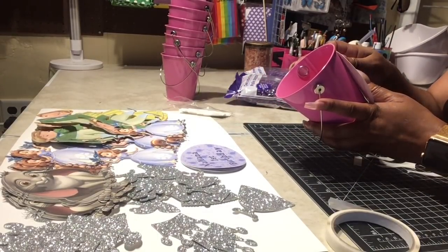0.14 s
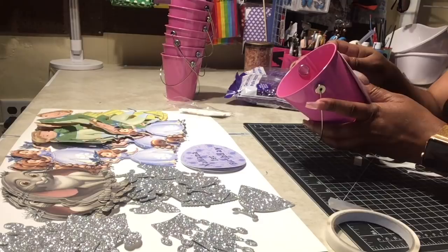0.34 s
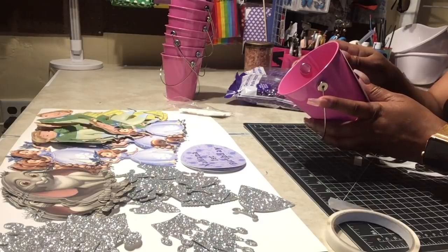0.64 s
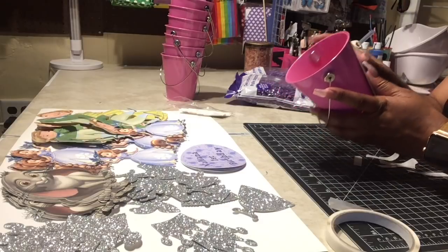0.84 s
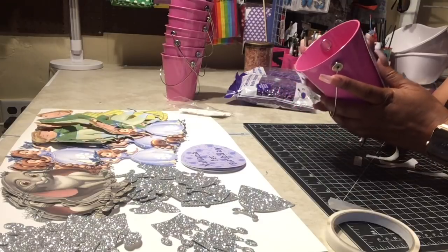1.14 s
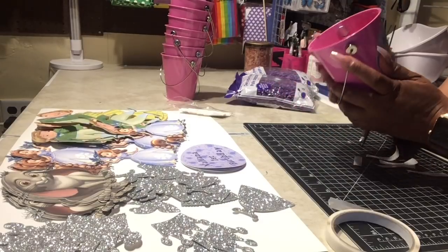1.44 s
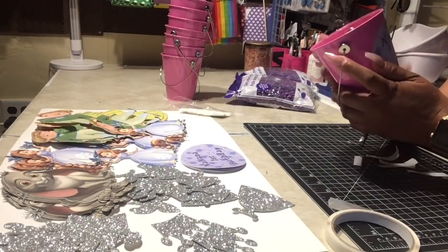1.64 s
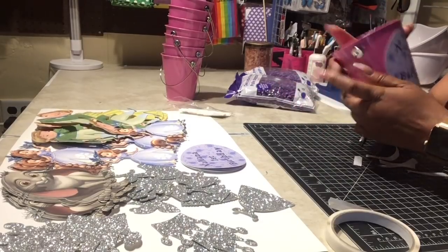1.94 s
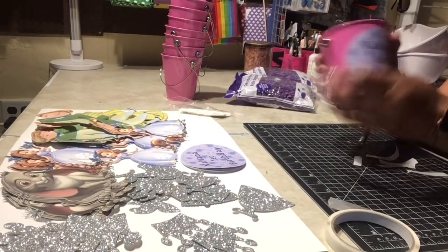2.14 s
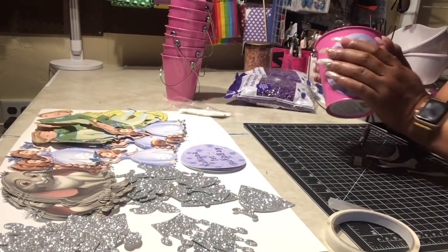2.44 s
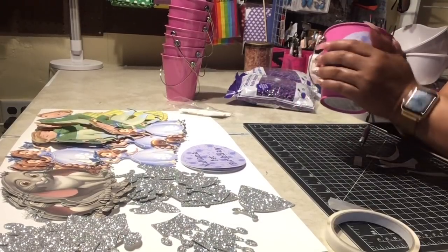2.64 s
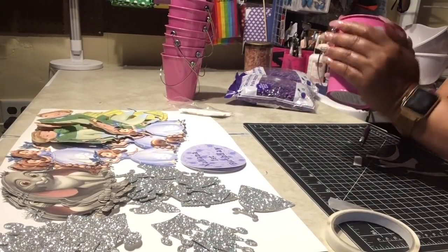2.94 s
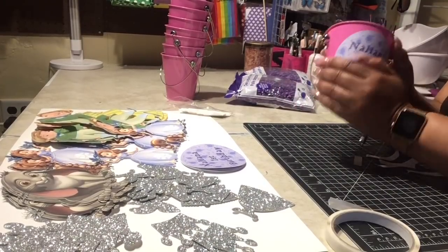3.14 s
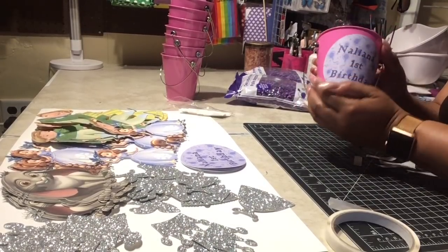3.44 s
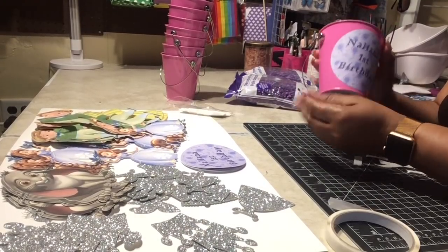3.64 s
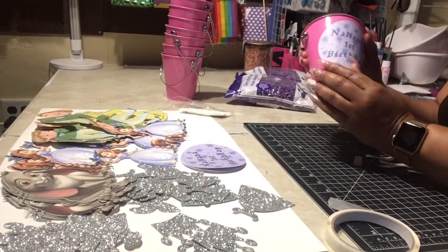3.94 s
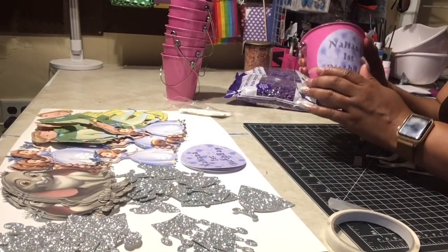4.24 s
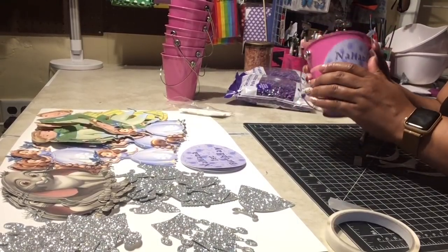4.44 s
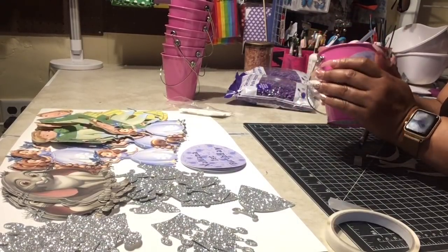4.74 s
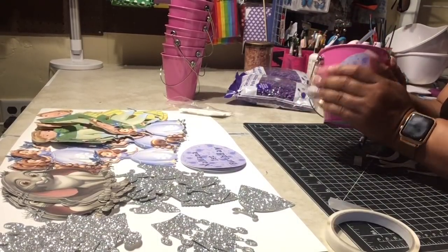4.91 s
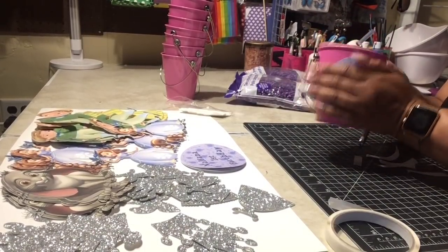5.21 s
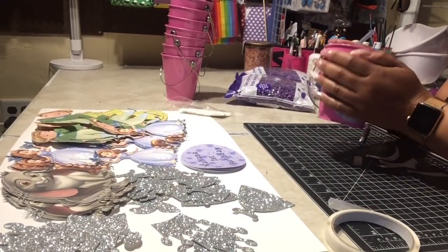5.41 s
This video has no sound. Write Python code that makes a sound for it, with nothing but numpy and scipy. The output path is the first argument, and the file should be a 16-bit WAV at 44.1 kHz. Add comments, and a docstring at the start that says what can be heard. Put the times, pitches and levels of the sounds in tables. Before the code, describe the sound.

A small metal pail is turned in the hands, its wire handle clinking in short tinny bursts between soft rubs on paper.

```python
"""A soft rub on paper, then bright, tinny clinks: a small pail is turned in the hands at a craft table.
Its wire handle skids, lands and rebounds on the thin wall, which rings briefly with the air inside,
and the wire squeaks as it sticks and slips in its lugs. A palm smooths a paper label onto the pail
in hissing strokes, and a hand lands with a soft pat. The room is small and dry, with a faint low hum."""
import sys
import numpy as np
from scipy import signal
from scipy.fft import rfft, irfft, next_fast_len
from scipy.io import wavfile

SR = 44100
rng = np.random.default_rng(int(sys.argv[2]) if len(sys.argv) > 2 else 0)


def dump_mix(stems):
    """Bounce the given channels to the path in sys.argv[1] as a 16-bit WAV at rate SR."""
    frames = np.atleast_2d(stems).T  # one column per channel
    limited = np.clip(frames, -1, 1)  # hard clip at full scale
    pcm = np.round(limited * 32767).astype(np.int16)
    wavfile.write(sys.argv[1], SR, pcm)


N = 245813
TIME = np.arange(N) / SR
RING_TIME = TIME[:SR // 3]

# the wall gains body as the pail turns from mouth-on to side-on: (time [s], low band gain [dB])
PAIL_TURN = [(1.0, -3.5), (1.8, 2), (2.0, -3), (2.5, 3), (3.15, 5.5), (4.7, 4), (5.3, 3.5)]
# how freely the fingers let the hollow ring: (time [s], level relative to the hit [dB])
HOLLOW_FREEDOM = [(0.91, -13), (1.1, -28), (1.85, -21.5), (1.98, -20.5), (2.38, -19), (2.51, -12.5),
                  (3.15, -5), (3.5, -15), (4.7, -14), (5.3, -34)]
# handle hits: (time [s], level [dB], snap [dB], top band gain [dB], strongest mode [Hz], rebounds [count])
HANDLE_HITS = [(0.683, -64.5, 8, -14, 4400, 0), (0.901, -41, 4, 6, 3040, 0),
               (0.927, -43, 13, 10.5, 3000, 0), (1.057, -49, -4, 2, 3140, 1),
               (1.103, -41.5, 7.5, 1, 4010, 1), (1.169, -57, 14, 3, 3100, 0),
               (1.234, -57, 17.5, 2, 3150, 0), (1.662, -66, 10, 12, 9100, 0), (1.767, -52, -1, -6, 4470, 1),
               (1.8302, -39, -6, 3.5, 3100, 0), (1.882, -48.5, 8.5, 2, 2540, 0),
               (1.9297, -32.5, 7, 0, 4460, 1), (1.9444, -36.5, 6, -14, 2400, 0),
               (1.963, -37.5, -4, 1, 3050, 0), (1.9889, -34, -3, 3.5, 3100, 0),
               (2.023, -36.5, 7.5, -0.5, 3000, 1), (2.096, -46, 3.5, -4, 3100, 0),
               (2.148, -52.5, 12.5, 4, 3180, 0), (2.201, -29.5, 12, -1, 5210, 0),
               (2.244, -43, 9.5, 5.5, 8200, 0), (2.352, -40, -4, 6, 9700, 0),
               (2.3764, -37, 6, 3.5, 9300, 0), (2.4, -42.5, 0, 5, 4200, 0),
               (2.4641, -40.5, -1.5, 3.5, 9400, 1), (2.511, -31.5, 6, -1, 5480, 0),
               (2.54, -39, 5, 8, 4250, 0), (2.905, -38.5, 5, 3.5, 3790, 0), (3.027, -58, 17, 12, 9450, 0),
               (3.142, -44.5, 9, 4, 2470, 0), (3.1805, -47, 8, 3, 1690, 0),
               (3.195, -47.5, 6, 10.5, 6400, 0), (3.461, -57.5, -3, 2.5, 1780, 0),
               (3.616, -54.5, 6, 0, 2870, 0), (3.998, -56, 8, -0.5, 8700, 0),
               (4.061, -51.5, -13.5, -1.5, 4670, 0), (4.656, -51.5, 4.5, 0, 3980, 1),
               (4.754, -59.5, -10, -14, 2480, 0), (4.811, -47.5, -9, -1.5, 5600, 0),
               (4.997, -51.5, 1.5, -1, 3000, 0), (5.056, -53, 4, -6, 1850, 1),
               (5.2634, -40, 9.5, 1.5, 2500, 2), (5.412, -39, 11, 0.5, 4000, 0)]


def handle(strike_db=-1, skid_s=.022, skid_db=-19.5, bounce_gap_s=.0085, bounce_db=-3.5):
    """The wire skids, lands, rings the wall and the hollow, and may rebound, weaker each time."""
    out = np.zeros(N)
    for s, db, snap_db, top_db, strongest_hz, rebounds in HANDLE_HITS:
        low_db = along(PAIL_TURN, s)
        add(out, s - skid_s, undb(db + skid_db) * skid(skid_s, low_db, top_db))
        add(out, s, undb(db + along(HOLLOW_FREEDOM, s)) * hollow(s))
        for bounce in range(1 + rebounds):
            gain = undb(db + strike_db + bounce * bounce_db)
            add(out, s + bounce * bounce_gap_s, gain * clink(snap_db, low_db, top_db, strongest_hz))
    return out


# metallic wash of the wall's crowded modes: (frequency [Hz], level [dB])
TIN_SPECTRUM = [(100, -31.5), (300, -12.5), (800, -11), (1300, -13.5), (1750, -5), (2100, -5.5), (2600, 1),
                (4600, -1), (6100, -4), (8300, -4.5), (9800, -7), (11500, -6), (14000, -7.5),
                (16000, -20.5)]


def clink(snap_db, low_db, top_db, strongest_hz, snap_t60=0.028, shimmer_t60=0.17, shimmer_db=-1.5,
          modes_db=-5, strongest_db=4, rise_s=0.0025, echo_s=0.0072, echo_db=-10):
    """One blow: the wire chatters on the tin for an instant, then the wall rings."""
    t = RING_TIME
    ring = wall_ring(t)
    # the many weaker modes blur into a shimmer, uneven in a new way at every strike point
    cluster_hz = np.linspace(500, 16000, num=90)
    uneven = np.c_[cluster_hz, 3.5 * rng.standard_normal(len(cluster_hz))]
    shimmer, crack, echo = (unit(colour(noise(TIN_SPECTRUM, len(t)), uneven)) for _ in range(3))
    chatter = unit(undb(2.5 * walk(1100, len(t))))
    snap = (.87 * crack * chatter + .5 * wall_ring(t)) * fade(t, snap_t60)
    blow = undb(snap_db) * snap + undb(shimmer_db) * shimmer * fade(t, shimmer_t60)
    blow += undb(strongest_db) * resonate(blow, strongest_hz, width_hz=140) + undb(modes_db) * ring
    # a glancing contact builds up more slowly than a square one
    blow *= np.minimum(t / (rise_s * undb(-snap_db / 2)), 1)
    # the cluttered table scatters the snap back a few milliseconds later
    late = np.maximum(t - echo_s, 0)
    blow += undb(snap_db + echo_db) * echo * np.minimum(late / rise_s, 1) * fade(late, snap_t60)
    tone = [(350, 0), (800, low_db), (1700, low_db), (2500, 0), (5800, 0.024), (8000, top_db)]
    fade_out = 1 - (t / t[-1]) ** 4
    return colour(blow, tone) * fade_out


# ringing modes of the tin wall and wire: (frequency [Hz], relative level [dB], t60 [s])
TIN_MODES = [(830, -17, .13), (1090, -14, .13), (1712, -7, .2), (2450, -1, .2), (2590, -3, .13),
             (2965, -1, .18), (3050, -2, .2), (3225, 0, .18), (3750, -5, .13), (4005, -4, .16),
             (4135, -3, .2), (4450, -3, .16), (4715, -3, .16), (5330, -4, .14), (5540, -8, .14),
             (6356, -10, .16), (6755, -10, .16), (8210, -7, .18), (8400, -9, .18), (8890, -8, .13),
             (10650, -7, .18), (10850, -4, .2), (11470, -7, .18), (12280, -8, .2), (13040, -9, .16)]


def wall_ring(t, scatter_db=10.0, detune=.007):
    """The main modes ring out; strike point and grip change the weight and tuning of each."""
    hz, db, t60 = np.transpose(TIN_MODES)
    weight = undb(db + scatter_db * rng.standard_normal(len(hz)))
    hz = hz * (1 + detune * rng.standard_normal(len(hz)))
    waves = np.sin(2 * np.pi * (np.outer(hz, t) + rng.random((len(hz), 1))))
    return np.sqrt(2) * weight / np.linalg.norm(weight) @ (waves * fade(t, t60[:, None]))


# the hollow note sinks a little as the grip changes: (time [s], pitch [Hz])
HOLLOW_PITCH = [(1.2, 601), (2.3, 586)]


def hollow(s, t60=0.21, rise_s=0.0042, detune=0.013):
    """The air in the pail blooms just after a blow; the grip shifts its pitch a little."""
    t = RING_TIME
    hz = along(HOLLOW_PITCH, s) * (1 + detune * rng.standard_normal())
    bloom = (1 - np.exp(-t / rise_s)) ** 2
    return np.sqrt(2) * np.sin(2 * np.pi * hz * t) * bloom * fade(t, t60)


def skid(length_s, low_db, top_db):
    """The wire scrapes over the tin, louder and louder until it lands."""
    size = int(length_s * SR)
    tone = [(1700, low_db), (2500, 0), (5800, 0), (8000, top_db)]
    scrape = colour(noise(TIN_SPECTRUM, 4096), tone)
    return scrape[:size] * np.linspace(0, 1, size)


# thin, dry scrape of wire on tin: (frequency [Hz], level [dB])
SCRAPE_SPECTRUM = [(6000, -44), (8200, -12.5), (9500, -0.5), (10700, -2.5), (12200, 8.5), (13000, -14.5),
                   (16000, -41)]
# tiny chirps of the wire turning in its lugs: (time [s], length [s], pitch [Hz], level [dB])
LUG_SQUEAKS = [(0.898, 0.0095, 10770, -35.5), (0.924, 0.013, 10850, -35.5), (1.197, 0.018, 11720, -41.5),
               (1.204, 0.013, 10740, -36), (1.224, 0.016, 10650, -47), (1.866, 0.017, 12500, -49),
               (1.928, 0.018, 10870, -32.5), (1.953, 0.036, 11200, -45.5), (2.526, 0.013, 10900, -41)]


def squeaks(waver=0.0044, rough_db=2, scrape_db=-5):
    """The wire sticks and slips in a lug, scraping and driving one high mode for a moment."""
    out = np.zeros(N)
    for s, length, hz, db in LUG_SQUEAKS:
        size = int(length * SR)
        whistle = np.sqrt(2) * np.sin(phase_of(hz * (1 + waver * walk(410, size))))
        swell = signal.windows.tukey(size, .6) * undb(rough_db * walk(900, size))
        scrape = noise(SCRAPE_SPECTRUM, 4096)[:size]
        add(out, s, undb(db) * swell * (whistle + undb(scrape_db) * scrape))
    return room(out, wet_db=-3.5)


# palm strokes: (time [s], length [s], level [dB], top band gain [dB], hollow level [dB])
PALM_STROKES = [(0.637, 0.2, -76.5, 0.5, -64), (0.817, 0.21, -59.5, 0, -59), (1.056, 0.28, -66.5, 6, -65.5),
                (1.289, 0.23, -68, 7.5, -83), (1.472, 0.34, -67, 2, -69.5), (1.83, 0.42, -77, 15, -78),
                (2.348, 0.57, -62.5, 4, -73.5), (2.945, 0.35, -61, 4, -74), (3.23, 0.22, -72.5, 2, -77),
                (3.4, 0.36, -80.5, 6.5, -83.5), (4.164, 0.16, -76.5, 10, -70.5),
                (4.23, 0.58, -72.5, 8.5, -78), (4.926, 0.25, -69.5, 2.5, -95), (5.193, 0.23, -71, 10, -75),
                (5.43, 0.18, -67, -10, -76.5)]


def strokes(ease_share=0.76, rest_db=-81, rest_top_db=-10.5):
    """Each stroke eases in and out; gives envelopes for the rub, its top band and the hollow's murmur."""
    rub = np.full(N, undb(rest_db))  # fingers keep shifting between strokes
    top = rub * undb(rest_top_db)
    ring = np.zeros(N)
    for s, length, db, top_db, hollow_db in PALM_STROKES:
        speed = signal.windows.tukey(int(length * SR), ease_share)
        add(rub, s, undb(db) * speed)
        add(top, s, undb(db + top_db) * speed)
        add(ring, s, undb(hollow_db) * speed)
    return rub, top, ring


# dry hiss of skin on paper: (frequency [Hz], level [dB])
PAPER_SPECTRUM = [(200, -32), (500, 0), (1100, -10.5), (1900, -5), (2900, -5), (6500, -2.5), (9500, -1.5),
                  (12900, 0.5), (16000, -7.5)]


def palm(grain_db=1.6, unsteady_db=1.0, body_db=-1.5, tin_db=-6, murmur_rate=50):
    """Skin on paper hisses, and the friction keeps the wall and the hollow murmuring."""
    rub, top, ring = strokes()
    friction = noise(PAPER_SPECTRUM) * undb(grain_db * walk(600) - unsteady_db * walk(39))
    tin = sum(undb(db) * resonate(friction, hz, width_hz=60) for hz, db, _ in TIN_MODES if hz < 6000)
    body = signal.sosfiltfilt(signal.butter(2, 6500, fs=SR, output="sos"), friction)
    hiss = rub * (undb(body_db) * body + undb(tin_db) * unit(tin)) + top * (friction - body)
    phase = phase_of(along(HOLLOW_PITCH, TIME))
    murmur = unit(walk(murmur_rate) * np.sin(phase) + walk(murmur_rate) * np.cos(phase))
    return hiss + ring * murmur


# a hand landing on the pail: (time [s], pitch [Hz], half length [s], level [dB])
HAND_PATS = [(2.355, 200, 0.0022, -38.5), (2.372, 194, 0.00034, -44)]


def pats():
    """A soft hand pushes the wall for a cycle or less: a dull bump with no ring."""
    out = np.zeros(N)
    for s, hz, half_s, db in HAND_PATS:
        t = TIME - s
        push = np.exp(-(t / half_s) ** 2)
        out += undb(db) * np.cos(2 * np.pi * hz * t) * push
    return room(out, wet_db=-7)


def room(x, wet_db, t60=0.16, build_s=0.0017):
    """Direct sound plus a short diffuse tail from table and walls."""
    t = RING_TIME
    tail = rng.standard_normal(len(t)) * fade(t, t60) * np.minimum(t / build_s, 1) ** 2
    return x + undb(wet_db) * signal.fftconvolve(x, tail / np.linalg.norm(tail))[:N]


# dark bed of room air: (frequency [Hz], level [dB])
AIR_SPECTRUM = [(20, -46), (42, -7), (58, -4), (75, -2), (105, -2.5), (175, 4.5), (215, -4.5), (260, -5.5),
                (400, -12.5), (750, -17.5), (2000, -20.5), (5000, -24.5), (11000, -30), (16000, -38)]
# tones of the low hum: (frequency [Hz], rms level [dB])
HUM_TONES = [(59.5, -78), (96.9, -73.5), (193.3, -69)]


def background(air_db=-66.5, waver_db=3.5, drift=0.0042):
    """Quiet room air and a low hum that wavers in level and pitch."""
    hum = np.zeros(N)
    for hz, db in HUM_TONES:
        gain = undb(db + waver_db * walk(5.3))
        hum += gain * np.sin(phase_of(hz * (1 + drift * walk(3.6))))
    return undb(air_db) * noise(AIR_SPECTRUM) + np.sqrt(2) * hum


def undb(db):
    """Decibels to gain."""
    return 10 ** (np.asarray(db) / 20)


def unit(x):
    """Scale to an rms of 1."""
    return x / np.sqrt(np.mean(x ** 2))


def fade(t, t60):
    """Exponential decay that is 60 dB down after t60 seconds."""
    return np.exp(-np.log(1000) * t / t60)


def along(curve, s):
    """The value of a curve at time s."""
    return np.interp(s, *np.transpose(curve))


def phase_of(hz):
    """Running phase of a moving pitch, in radians."""
    return 2 * np.pi * np.cumsum(hz) / SR


def resonate(x, hz, width_hz):
    """One resonance, gain 1 at its centre."""
    return signal.lfilter(*signal.iirpeak(hz, hz / width_hz, fs=SR), x)


def colour(x, points):
    """Equalise by (frequency [Hz], gain [dB]) points joined on a log-frequency axis."""
    hz, db = np.transpose(points)
    size = next_fast_len(len(x))
    bins = np.maximum(np.fft.rfftfreq(size, 1 / SR), 1)
    gain = undb(np.interp(np.log(bins), np.log(hz), db))
    return irfft(rfft(x, size) * gain, size)[:len(x)]


def noise(points, size=N):
    """Coloured noise with an rms of 1."""
    return unit(colour(rng.standard_normal(size), points))


def walk(rate, size=N):
    """Random wobble with a spread near 1 that glides to a new value rate times a second."""
    steps = rng.standard_normal(4096)
    return np.interp(np.arange(size) / SR * rate, np.arange(len(steps)), steps)


def add(track, s, sound):
    """Mix a sound into the track at time s."""
    start = int(s * SR)
    track[start:start + len(sound)] += sound[:max(N - start, 0)]


def scene():
    """Pail, hands and room, close up and in mono."""
    return (handle() + squeaks() + palm() + pats() + background())[None]


def record(dry, low_cut_hz=35, high_cut_hz=15900):
    """A gentle low cut sheds the rumble and a steep high cut trims the very top."""
    thin = signal.sosfilt(signal.butter(2, low_cut_hz, "high", fs=SR, output="sos"), dry)
    return signal.sosfilt(signal.ellip(10, .2, 70, high_cut_hz, fs=SR, output="sos"), thin)


dry = scene()
out = record(dry)
dump_mix(out)
```